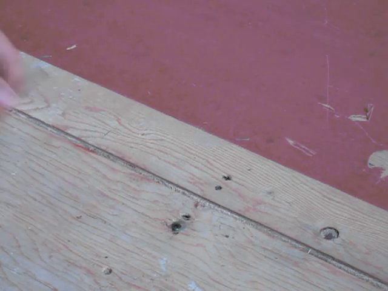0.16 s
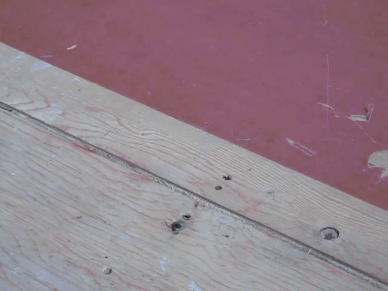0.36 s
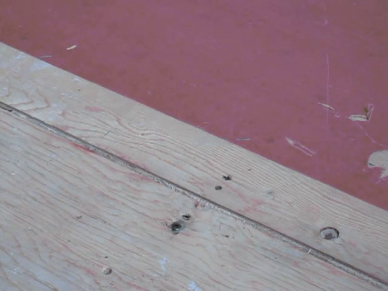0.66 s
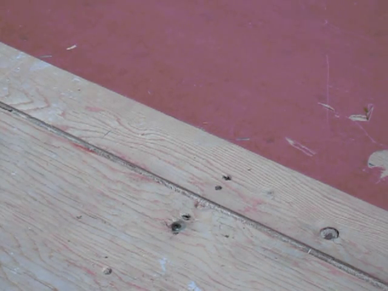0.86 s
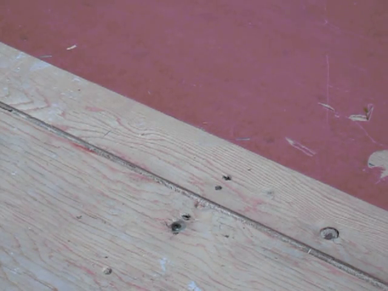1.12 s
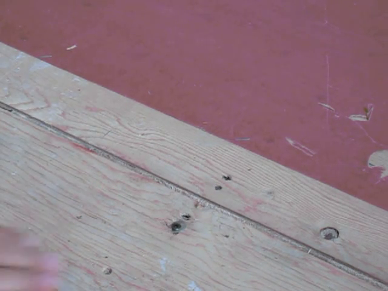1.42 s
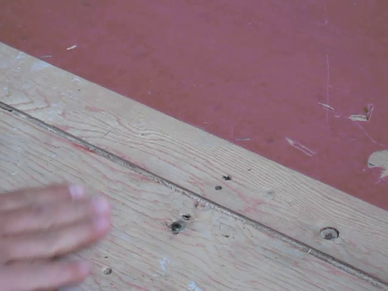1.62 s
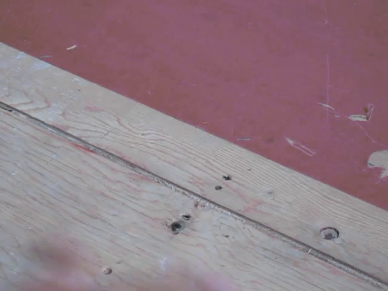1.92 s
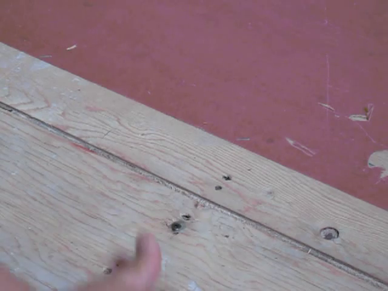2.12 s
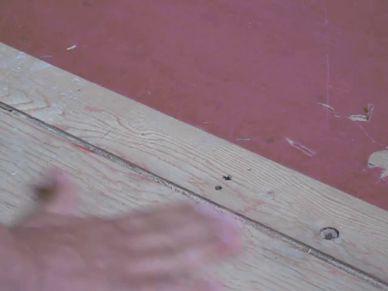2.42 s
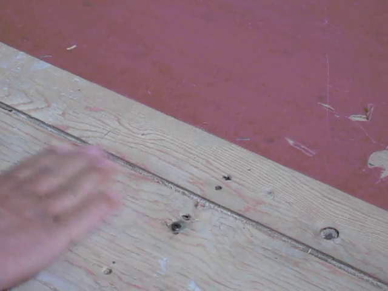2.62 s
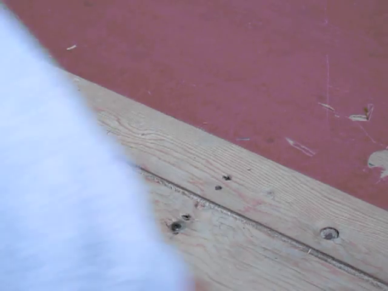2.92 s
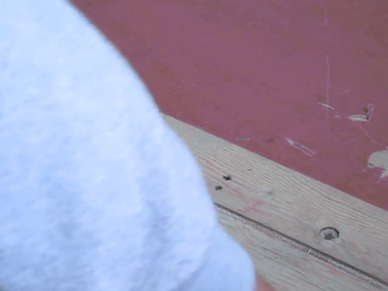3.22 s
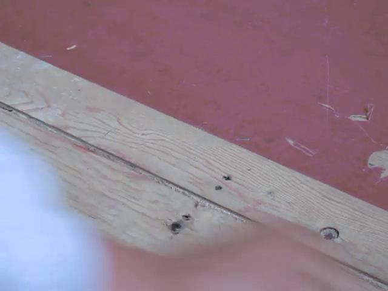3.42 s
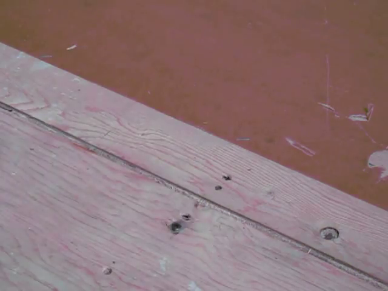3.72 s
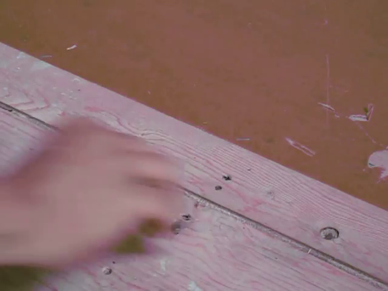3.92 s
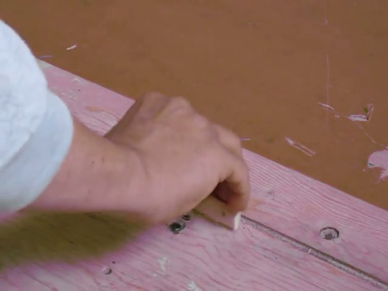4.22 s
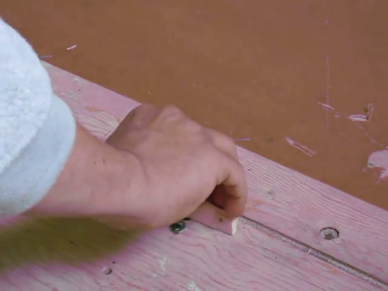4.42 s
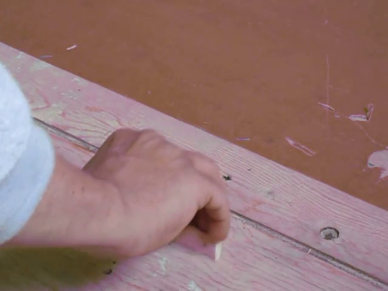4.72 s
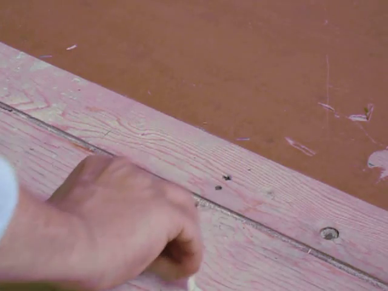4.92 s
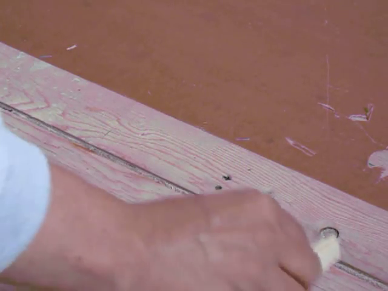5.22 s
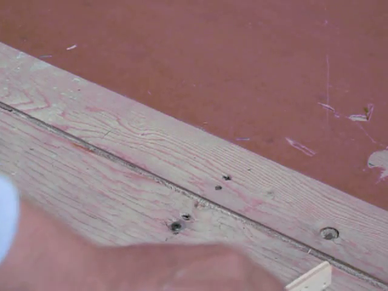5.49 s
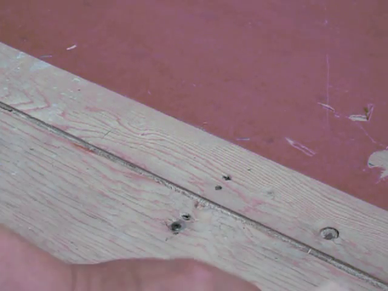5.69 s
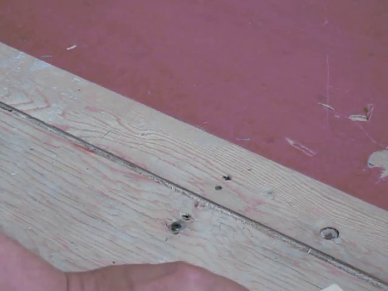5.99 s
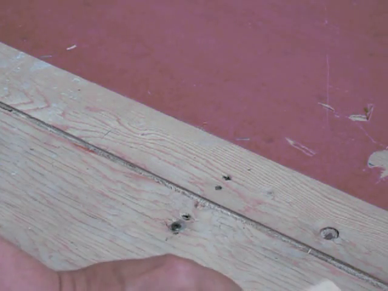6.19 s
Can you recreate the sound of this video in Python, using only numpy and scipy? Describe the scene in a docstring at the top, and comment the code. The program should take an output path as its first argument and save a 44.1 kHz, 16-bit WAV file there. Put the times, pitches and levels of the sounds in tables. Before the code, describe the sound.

Close mono sound of handwork on a bare wooden floor indoors. A loud, hard wooden clap with a brief skid and lighter clacks comes first, then airy palm wipes of uneven length and a gritty rub. Crisp ticks lead into short block scrapes that build to a longer rasp, ending in hollow knocks and soft sleeve movement. Faint hiss and short room reverberation surround everything.

```python
"""Work on a bare plywood floor in a quiet, fairly live room, over a faint steady hiss: coloured noise.
A sleeve rustles (filtered friction), then a piece of wood claps down, skids and tips over (resonant contacts).
A palm wipes the boards in three strokes and a short gritty one (dense random slips); the floor booms faintly
(resonant noise). Hard contacts, dull knocks and grit ticks follow; a small block is scraped along the grain
in four pushes (coarse and fine slips), with more ticks and knocks, and is set down as the sleeve rustles on."""
import sys
import numpy as np
from scipy import signal
from scipy.fft import rfft, irfft
from scipy.io import wavfile

SR = 44100
rng = np.random.default_rng(int(sys.argv[2]) if len(sys.argv) > 2 else 0)


def dump(signal):
    """Clip the signal to [-1, 1] and save it as 16-bit WAV at the path in sys.argv[1]."""
    limited = np.clip(np.atleast_2d(signal).T, -1, 1)
    pcm = np.round(limited * 32767).astype(np.int16)
    wavfile.write(sys.argv[1], SR, pcm)


N = 280035
TIME_S = np.arange(N) / SR

# All levels are before room, bounce and source gain; tones are relative spectra.
# room decay: f/Hz, t60/s
ROOM_T60 = [(200, 0.5), (500, 0.51), (2000, 0.45), (5000, 0.41), (12000, 0.3)]
# hiss spectrum: f/Hz, level/dB
AIR_TONE = [(20, -7.5), (45, -2), (70, 3), (110, -2), (200, -3.5), (400, -4), (800, -5.5), (1500, -6.5),
            (2400, -4), (3500, -8), (6000, -13.5), (10500, -15), (13000, -24), (17000, -32)]
# faint whine in the hiss: f/Hz, width/Hz, level/dB
AIR_RINGS = [(2171, 82, 6.5), (2440, 40, 7), (2610, 43, 4.5)]
# cloth moving, light brushes lack lows: t/s, swell/s, hold/s, fade/(dB/s), level/dB, high-pass f/Hz
SLEEVE_MOVES = [(.2, 0.27, .1, 13, -52, 150), (1.33, 0.029, 0.076, 26, -49, 400),
                (1.735, 0.05, 0.064, 135, -45, 9000), (2.88, .05, 0.18, 50, -52.5, 2970),
                (3.402, .002, 0.0084, 900, -35.5, 2500), (3.55, .14, .03, 57, -50, 400),
                (5.198, 0.01, 0.0079, 114, -45, 5000), (5.364, .005, 0.018, 43, -44, 1500),
                (5.695, 0.045, .008, 90, -46, 2200), (6.13, 0.15, 0.096, 100, -41, 100)]
# cloth spectrum: f/Hz, level/dB
CLOTH_TONE = [(200, -34), (420, 13.5), (700, 7), (1100, 6), (2500, 1), (5000, 1), (9000, -1), (12000, -4),
              (16500, -23)]
# narrow rings in the rustle: f/Hz, width/Hz, level/dB
RUSTLE_RINGS = [(3200, 300, -13), (6630, 160, 3.5), (10140, 340, -1), (12600, 510, -15)]
# flat, hard contacts: t/s, level/dB, main ring f/Hz, low-pass f/Hz
CLAPS = [(1.0817, 11, 337, 15300), (1.0836, 8.5, 480, 4930), (1.0912, 9, 920, 7000),
         (1.167, 1, 1680, 16000), (1.409, -1.5, 1030, 4570), (1.4155, -5, 1060, 5160),
         (3.2425, 1.5, 1220, 3200), (3.2565, -3.5, 1900, 5000)]
# wood sliding on wood: t/s, rise/s, hold/s, hiss level/dB, body re hiss before lean/dB
SKIDS = [(1.094, .004, .047, -23, -0.5), (1.192, 0.035, 0.0056, -25, -12.5)]
# resonances of the loose piece of wood: f/Hz, width/Hz, level/dB
PIECE_MODES = [(970, 68, -11), (1100, 70, -2.5), (1300, 50, -2.5), (1700, 135, 1), (1864, 80, 3),
               (2220, 110, -11), (2850, 70, 5), (4600, 340, -24)]
# clap and skid spectrum: f/Hz, level/dB
CLAP_TONE = [(88, -56), (150, -41), (256, -20.5), (373, -15.5), (599, -15), (1300, -9), (2590, -10.5),
             (2860, -7.5), (3930, -13), (9770, -19), (12900, -27), (15400, -39), (17000, -66)]
# plywood modes: f/Hz, level/dB, t60/s
BOARD_MODES = [(308, -6, 0.48), (376, -3.5, 0.56), (404, 3, 0.32), (452.8, 4, 0.3), (476, -10.5, 0.51),
               (547, -15, 0.64), (631, -7, 0.35), (735, -22.5, 0.11), (907, -2.5, 0.18), (942, 0, 0.25),
               (990, -11, 0.41), (1040, -11, 0.63), (1360, 2, 0.15), (1236, 3.5, 0.14), (1597, -4, 0.22)]
# palm strokes: t/s, rise/s, hold/s, hiss level/dB, body re hiss before lean/dB, treble at full speed/dB
WIPES = [(1.829, 0.13, 0.0046, -22, -14.5, 0.5), (2.266, .2, .15, -28, -14, -0.5),
         (2.704, 0.057, 0.016, -35, -14.5, 3.5)]
# wipe spectrum: f/Hz, level/dB
WIPE_TONE = [(130, -29), (250, -33), (360, -14), (500, -9), (700, -9), (1070, -6), (1400, -8), (2200, -2),
             (3400, -1), (5500, -6), (10600, -8.5), (14700, -21), (17000, -46)]
# short gritty stroke: t/s, rise/s, hold/s, hiss level/dB, body re hiss before lean/dB
SCUFFS = [(3.17, 0.068, 0.043, -27.5, -10)]
# scuff spectrum: f/Hz, level/dB
SCUFF_TONE = [(130, -53), (220, -17), (366, -5), (655, -5.5), (1110, -8), (1380, -16), (1990, -6),
              (2660, -18), (3560, -9), (4190, -20), (5600, -9), (7640, -14), (10000, -7.5), (12000, -14.5),
              (17000, -36)]
# floor flexing under the worker's weight, and once as the block lands: t/s, swell/s, hold/s, level/dB
FLOOR_FLEXES = [(3.09, 0.15, 0.072, -56), (4.275, 0.018, 0.012, -43), (4.51, 0.074, 0.4, -49.5)]
# blunt contacts: t/s, level/dB, main ring f/Hz, low-pass f/Hz
KNOCKS = [(3.111, -25.5, 462, 1300), (3.129, -31, 480, 900), (4.2845, -14, 500, 970),
          (4.7365, -6.5, 674, 2310), (5.3685, -5.5, 377, 1100), (5.3793, 1.5, 370, 1330),
          (5.7605, -14, 386, 920), (5.768, -6, 1210, 1900), (5.7735, -16.5, 460, 1900),
          (5.801, -10, 432, 794)]
# thud spectrum: f/Hz, level/dB
KNOCK_TONE = [(120, -39), (220, -5), (300, -11), (380, -1.5), (470, 2.5), (650, -5.5), (1000, 0),
              (1400, -7.5), (2300, -7.5), (5000, -16), (12000, -25.5), (17000, -33)]
# grit and splinters catching: t/s, level/dB, pitch f/Hz
TICKS = [(3.132, -19.5, 6800), (3.2082, 0, 3430), (3.243, 2.5, 6000), (3.316, -1, 10600),
         (3.405, -28, 6500), (3.412, -6.5, 6600), (4.284, -22, 9000), (4.299, -16.5, 9000),
         (4.3702, -18, 6040), (4.4162, -10, 9400), (4.424, -6, 9800), (4.492, -6, 7150), (4.551, 0.5, 3700),
         (4.632, -20, 4500), (4.734, 6.5, 3480), (4.8537, 11, 6000), (4.861, 2, 9000), (4.99, 5, 6070),
         (4.9949, 3, 7100), (5.7295, -14, 3500)]
# block pushes: t/s, rise/s, hold/s, hiss level/dB, body re hiss before lean/dB
SCRAPES = [(4.366, 0.0033, 0.018, -38, -14), (4.419, 0.0097, 0.089, -37.5, -11.5),
           (4.506, 0.13, 0.0063, -30.5, -7.5), (4.663, 0.11, 0.22, -27, -10)]
# scrape spectrum: f/Hz, level/dB
SCRAPE_TONE = [(130, -39), (220, -14.5), (279, -6.5), (322, -14), (366, -1), (517, -5.5), (667, 2.5),
               (772, 2), (1030, 0.5), (2470, -4), (3370, -3), (4510, -4.5), (6250, -7.5), (11200, -6.5),
               (17000, -35)]

AIR_DB = -48.5  # rms
TOUCH_SPEED, TOUCH_S = 0.11, 0.0074  # share of full speed at first touch; time to make contact
LEAN_S = 0.016  # time constant of the pressure shift towards a stroke's end
BOARD_FADE_DB_PER_S, FLEX_FADE_DB_PER_S = 180, 190
TREBLE_FOLLOWS_SPEED = 0.4  # dB of treble per dB of palm speed
BODY_SPLIT_HZ, CUTOFF_HZ = 1500, 17200
TINY = 1e-18  # keeps the recursive filters off denormals


def from_db(db):
    """Decibels to gain."""
    return 10 ** (np.asarray(db) / 20)


def rms_one(x):
    """Scale to rms 1."""
    return x / np.sqrt(np.mean(x ** 2) + 1e-20)


def unit_energy(x):
    """Scale to energy 1."""
    return x / np.linalg.norm(x)


def at_hz(points, hz):
    """Read a table on a log-frequency axis."""
    f, value = np.transpose(points)
    return np.interp(np.log(np.maximum(hz, 1)), np.log(f), value)


def cut(x, hz, kind, order=2):
    """Butterworth low- or high-pass."""
    return signal.sosfilt(signal.butter(order, hz, kind, fs=SR, output="sos"), x + TINY)


def colour(x, tone):
    """Minimum-phase filter of unit energy, shaped by a tone table."""
    size = 4096
    bins_hz = np.arange(size // 2 + 1) * SR / size
    cepstrum = irfft(np.log(from_db(at_hz(tone, bins_hz))))
    # fold the cepstrum to make it causal
    cepstrum[1:size // 2] *= 2
    cepstrum[size // 2 + 1:] = 0
    pulse = irfft(np.exp(rfft(cepstrum)))
    return signal.oaconvolve(x, unit_energy(pulse))[:N]


def resonate(x, peaks):
    """Sum of parallel resonances (f/Hz, width/Hz, level/dB)."""
    out = 0
    for hz, width_hz, db in peaks:
        b, a = signal.iirpeak(hz, hz / width_hz, fs=SR)
        out = out + from_db(db) * signal.lfilter(b, a, x + TINY)
    return out


def add(track, start_s, sound):
    """Mix a sound in at start_s."""
    start = round(start_s * SR)
    track[start:start + len(sound)] += sound[:N - start]


def motion(start_s, rise_s, hold_s, fade_db_per_s):
    """Speed of one movement, 0-1: soft touch, quarter-sine rise, hold, exponential fade."""
    t, speed = TIME_S[:2 * SR], np.zeros(N)
    rise = np.sin(np.pi / 2 * np.minimum(t / rise_s, 1))
    gather = TOUCH_SPEED + (1 - TOUCH_SPEED) * rise
    fade = from_db(-fade_db_per_s * np.maximum(t - rise_s - hold_s, 0))
    add(speed, start_s, np.minimum(t / TOUCH_S, 1) * gather * fade)
    return speed


def friction(slips_per_s, spread_db, judder_db, judder_hz):
    """Random tiny slips of uneven size under a grip that judders at random below judder_hz."""
    sizes = from_db(spread_db * np.minimum(rng.exponential(1, N), 5)) * rng.standard_normal(N)
    grip = from_db(judder_db * rms_one(cut(rng.standard_normal(N), judder_hz, "low")))
    slipping = rng.random(N) < slips_per_s / SR
    return rms_one(sizes * slipping * grip)


def room(x, wet_db, build_s):
    """Direct sound plus a diffuse tail that builds up, each octave dying at its own rate."""
    t, edges_hz = TIME_S[:SR], 80 * 2 ** np.arange(9)
    white, hz = rfft(rng.standard_normal(SR)), np.arange(SR // 2 + 1)
    tail = np.zeros(SR)
    for low, high in zip(edges_hz, edges_hz[1:]):
        band = irfft(white * (hz >= low) * (hz < high), SR)
        tail += band * from_db(-60 * t / at_hz(ROOM_T60, np.sqrt(low * high)))
    tail *= 1 - np.exp(-t / build_s)
    return x + from_db(wet_db) * signal.oaconvolve(x, unit_energy(tail))[:N]


def contact(crunch_db, t60_s):
    """One touch: a click plus a decaying noise crunch as the rough faces settle."""
    t = TIME_S[:SR // 4]
    crunch = rng.standard_normal(len(t)) * from_db(-60 * t / t60_s)
    click = t == 0
    return click + from_db(crunch_db) * unit_energy(crunch)


def blows(table, crunch_db, t60_s, ring_db):
    """Contact forces: the struck spot favours one pitch, with little below it."""
    force = np.zeros(N)
    for start_s, db, ring_hz, top_hz in table:
        touch = cut(contact(crunch_db, t60_s), top_hz, "low")
        touch = cut(touch, ring_hz * 0.99, "high")
        ring = resonate(touch, [(ring_hz, ring_hz / 6, ring_db)])
        add(force, start_s, from_db(db) * (touch + ring))
    return force


def board(force):
    """Plywood modes: decaying sines of alternating sign, driven by a force."""
    t = TIME_S[:SR // 2]
    ring = np.zeros(len(t))
    for k, (hz, db, t60_s) in enumerate(BOARD_MODES):
        ring += (-1) ** k * from_db(db - 60 * t / t60_s) * np.sin(2 * np.pi * hz * t)
    return signal.oaconvolve(force, unit_energy(ring))[:N]


def strokes(rows, slips, tone, board_db, fade_db_per_s, lean_db):
    """Slips hiss at the surface; pressure, shifting by lean_db towards the end, drives the lower body."""
    sound = colour(slips, tone)
    hiss = rms_one(cut(sound, BODY_SPLIT_HZ, "high", order=3))
    body = rms_one(cut(sound, BODY_SPLIT_HZ, "low", order=3))
    body = rms_one(body + from_db(board_db) * rms_one(board(slips)))
    out = np.zeros(N)
    for start_s, rise_s, hold_s, db, pressure_db in rows:
        lean = np.exp(np.minimum(TIME_S - start_s - rise_s - hold_s, 0) / LEAN_S)
        hiss_gain = motion(start_s, rise_s, hold_s, fade_db_per_s)
        body_gain = motion(start_s, rise_s, hold_s, BOARD_FADE_DB_PER_S)
        body_gain = body_gain * from_db(pressure_db + lean_db * lean)
        out += from_db(db) * (hiss_gain * hiss + body_gain * body)
    return out


def floor_bounce(x, delay_s, sway, sway_hz, bounce_db):
    """Floor reflection whose delay wanders at random, so the comb colour keeps shifting."""
    knots_s = np.arange(0, TIME_S[-1] + 1, 1 / sway_hz)
    wander = np.interp(TIME_S, knots_s, rng.uniform(-1, 1, len(knots_s)))
    delays_s = delay_s * np.exp(sway * wander)
    gain = from_db(bounce_db)
    return (x + gain * np.interp(TIME_S - delays_s, TIME_S, x)) / np.hypot(1, gain)


def far_wall(x, delay_s, echo_db, top_hz):
    """Adds a dull, smeared echo from the far end of the room."""
    echo = np.zeros(N)
    add(echo, delay_s, cut(room(x, wet_db=-15, build_s=0.00076), top_hz, "low"))
    return x + from_db(echo_db) * echo


def background():
    """Steady hiss: coloured noise with faintly whining resonances."""
    white = rng.standard_normal(N)
    return from_db(AIR_DB) * rms_one(colour(white + resonate(white, AIR_RINGS), AIR_TONE))


def sleeve():
    """Soft cloth rustle: fibre slips with a few thin rings."""
    fibres = friction(slips_per_s=12000, spread_db=1.5, judder_db=1.0, judder_hz=35)
    rustle = rms_one(colour(fibres + resonate(fibres, RUSTLE_RINGS), CLOTH_TONE))
    out = np.zeros(N)
    for start_s, rise_s, hold_s, fade_db_per_s, db, low_hz in SLEEVE_MOVES:
        brush = cut(rustle, low_hz, "high", order=1)
        out += from_db(db) * motion(start_s, rise_s, hold_s, fade_db_per_s) * brush
    return out


def falling_piece():
    """Hard contacts excite the loose wood's modes and the room; friction drives the same modes in the skid."""
    force = blows(CLAPS, crunch_db=5.0, t60_s=0.044, ring_db=3.0)
    crack = colour(force + resonate(force, PIECE_MODES), CLAP_TONE)
    slips = friction(slips_per_s=8000, spread_db=2.3, judder_db=2.0, judder_hz=60)
    slips = slips + resonate(slips, PIECE_MODES)
    skid = strokes(SKIDS, slips, CLAP_TONE, board_db=-11.5, fade_db_per_s=400, lean_db=-6.0)
    return from_db(-7) * room(crack, wet_db=-5, build_s=0.00085) + room(skid, wet_db=-5, build_s=0.0028)


def palm_wipes():
    """Dry skin: fine, dense slips whose treble follows the stroke speed."""
    slips = friction(slips_per_s=26000, spread_db=1.0, judder_db=0.76, judder_hz=60.7)
    slips = slips + resonate(slips, [(1900, 520, -12), (3440, 260, -16)])
    rows = [row[:-1] for row in WIPES]
    wipes = strokes(rows, slips, WIPE_TONE, board_db=-12.0, fade_db_per_s=237, lean_db=8)
    treble = np.zeros(N)
    for start_s, rise_s, hold_s, _, _, treble_db in WIPES:
        speed = motion(start_s, rise_s, hold_s, fade_db_per_s=300)
        treble = np.maximum(treble, from_db(treble_db) * speed ** TREBLE_FOLLOWS_SPEED)
    return wipes + (treble - 1) * cut(wipes, 7500, "high", order=1)


def palm_scuff():
    """Gritty stroke: sparser slips with stronger resonances."""
    slips = friction(slips_per_s=11000, spread_db=1.0, judder_db=1.0, judder_hz=90)
    slips = slips + resonate(slips, [(350, 130, -3), (1050, 110, 0), (1900, 280, 1.5),
                                     (3320, 890, 4.5), (6600, 600, -3)])
    return strokes(SCUFFS, slips, SCUFF_TONE, board_db=-9, fade_db_per_s=258, lean_db=3)


def palm():
    """All palm strokes, with floor bounce and room."""
    near = floor_bounce(palm_wipes() + palm_scuff(), delay_s=0.000912, sway=0.41, sway_hz=7, bounce_db=-12.5)
    return room(near, wet_db=-9, build_s=0.0017)


def floor_flex():
    """The sheet booms faintly when leant on or when the block lands: noise through two low resonances in
    series."""
    boom = resonate(rng.standard_normal(N), [(70.6, 8.9, 0)])
    boom = rms_one(resonate(boom, [(75.6, 94, 0)]))
    weight = np.zeros(N)
    for start_s, rise_s, hold_s, db in FLOOR_FLEXES:
        weight += from_db(db) * motion(start_s, rise_s, hold_s, FLEX_FADE_DB_PER_S)
    return boom * weight


def knocks():
    """Blunt blows ring the plywood while settling faces thud; the far wall returns the lows."""
    ring = board(blows(KNOCKS, crunch_db=-22, t60_s=0.022, ring_db=-15.0))
    force = blows(KNOCKS, crunch_db=0, t60_s=0.038, ring_db=5)
    thud = far_wall(colour(force, KNOCK_TONE), delay_s=.053, echo_db=-4.5, top_hz=540)
    return from_db(4.5) * room(thud, wet_db=-3.5, build_s=0.0012) + from_db(7.5) * ring


def grit_ticks():
    """Grit and splinters snap: brief contacts through one broad resonance each."""
    grit = np.zeros(N)
    for start_s, db, hz in TICKS:
        snap = resonate(contact(crunch_db=-1.0, t60_s=0.037), [(hz, hz * 0.34, 0)])
        add(grit, start_s, from_db(db) * cut(snap, 13800, "low"))
    return from_db(2.5) * room(grit, wet_db=-10.5, build_s=0.00049)


def block_scrape():
    """The block's edge rasps over the grain: sparse slips while slow, dense ones while fast."""
    coarse = friction(slips_per_s=3200, spread_db=-0.5, judder_db=3.5, judder_hz=69.0)
    fine = friction(slips_per_s=16000, spread_db=2.1, judder_db=-0.8, judder_hz=89.5)
    speed = np.zeros(N)
    for start_s, rise_s, hold_s, db, _ in SCRAPES:
        speed += from_db(db) * motion(start_s, rise_s, hold_s, fade_db_per_s=400)
    fine_share = np.clip(0.89 * speed / speed.max(), 0, 1)
    slips = np.sqrt(1 - fine_share) * coarse + np.sqrt(fine_share) * fine
    slips = slips + resonate(slips, [(3500, 370, -1.5), (6600, 1200, -4.5)])
    rasp = strokes(SCRAPES, slips, SCRAPE_TONE, board_db=-12.0, fade_db_per_s=420, lean_db=-1.0)
    rasp = floor_bounce(rasp, delay_s=0.000707, sway=0.21, sway_hz=9, bounce_db=-11.5)
    return room(rasp, wet_db=-10.5, build_s=0.00049)


def scene():
    """Sum of all sources, one channel."""
    mix = background() + sleeve() + falling_piece() + palm()
    mix = mix + floor_flex() + knocks() + grit_ticks() + block_scrape()
    return mix[None]


def record(dry):
    """Rounds the highest peaks, then cuts the top with a steep low-pass."""
    rounded = dry / (1 + dry ** 4) ** .25
    return signal.sosfilt(signal.ellip(10, .1, 80, CUTOFF_HZ, fs=SR, output="sos"), rounded)


dry = scene()
out = record(dry)
dump(out)
```